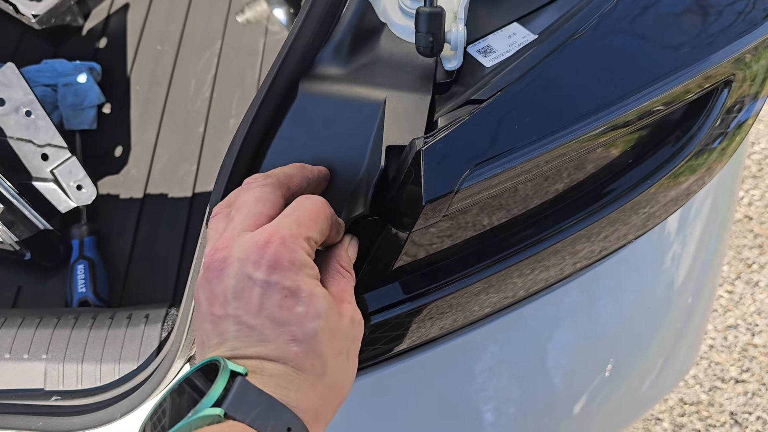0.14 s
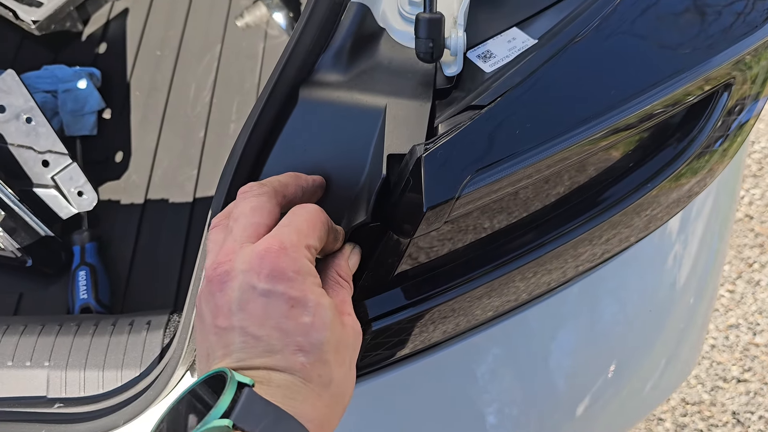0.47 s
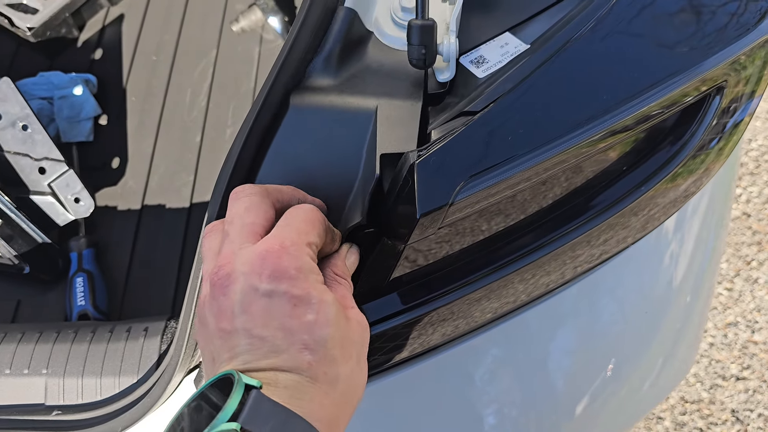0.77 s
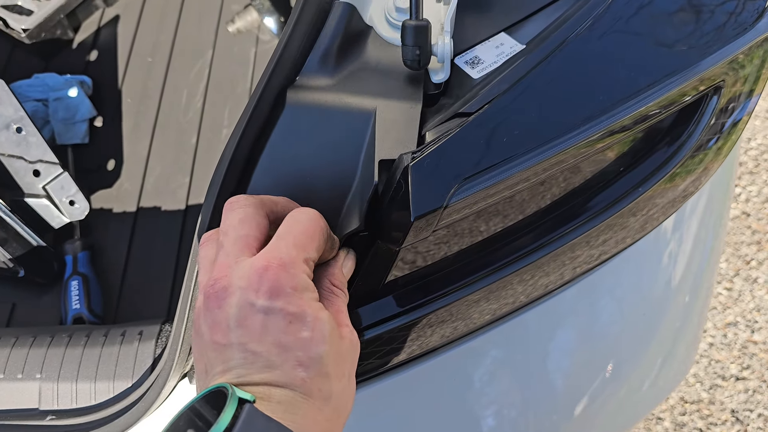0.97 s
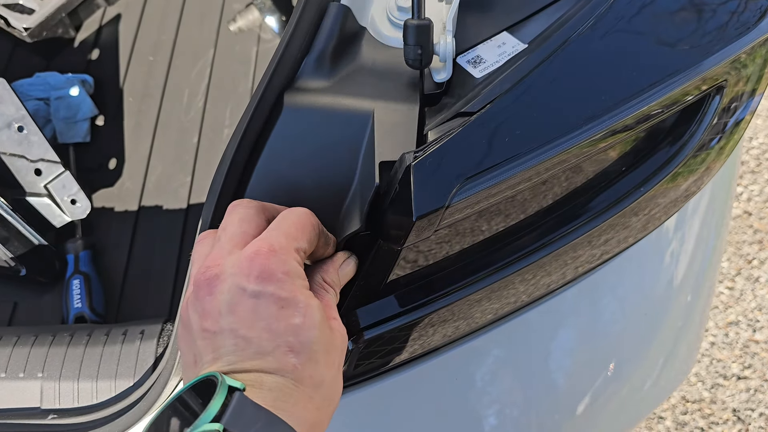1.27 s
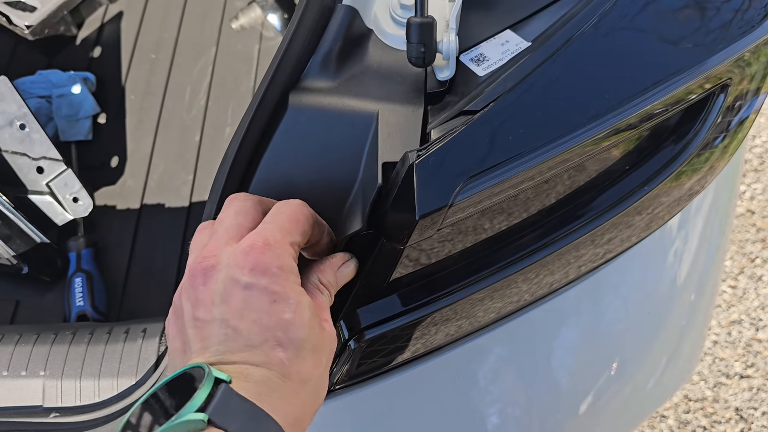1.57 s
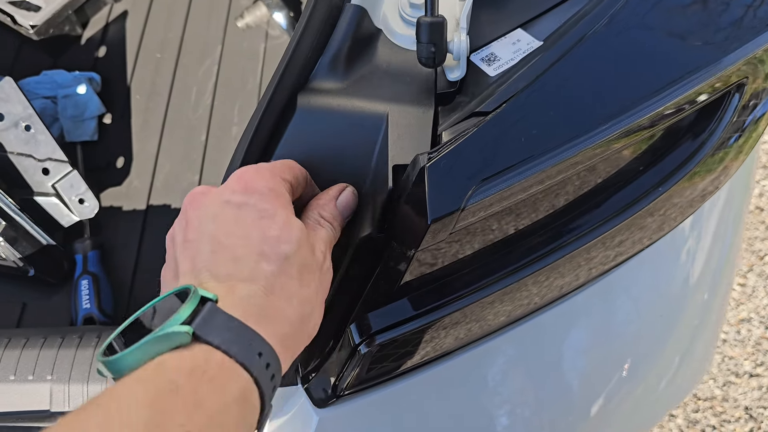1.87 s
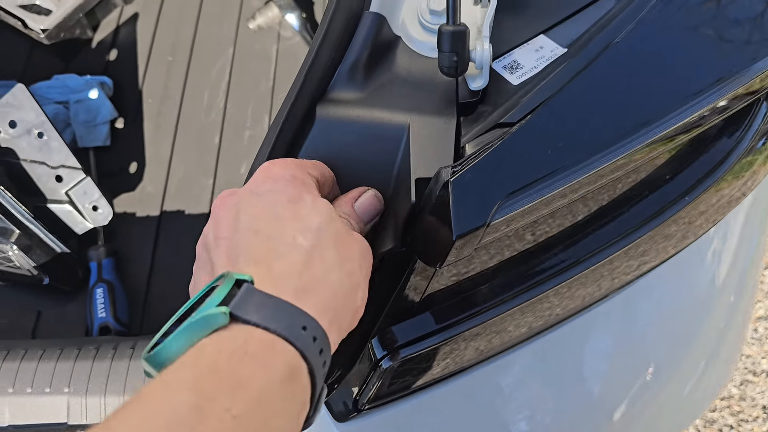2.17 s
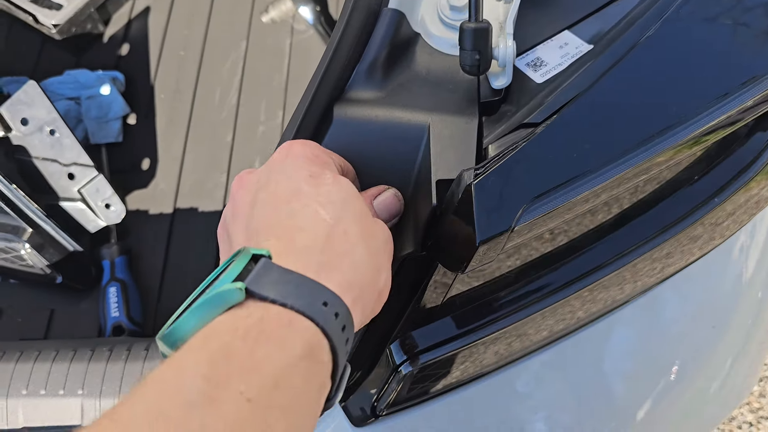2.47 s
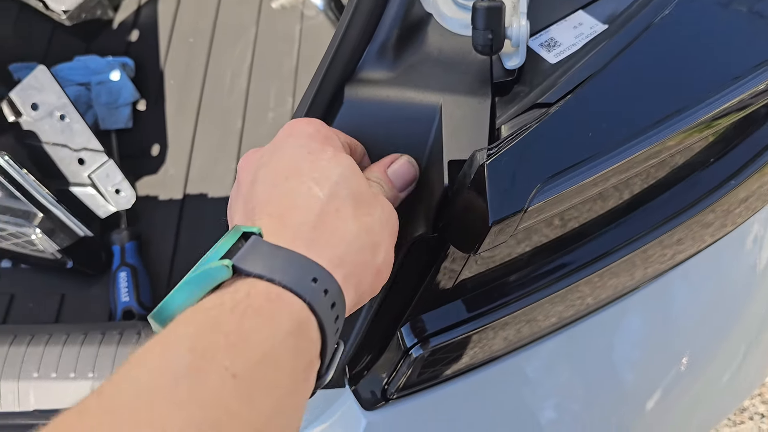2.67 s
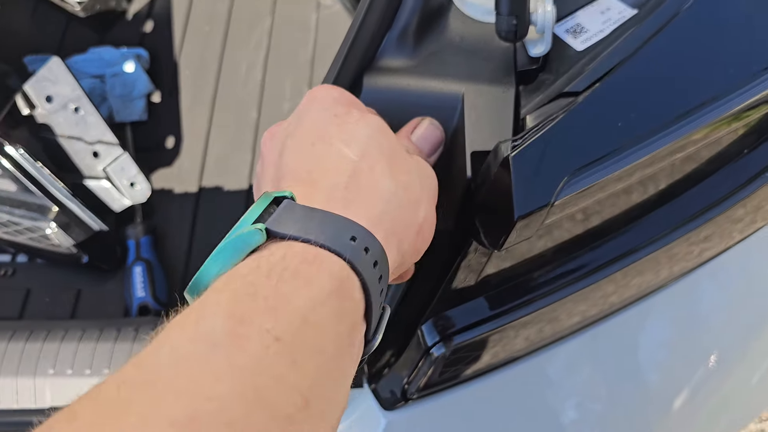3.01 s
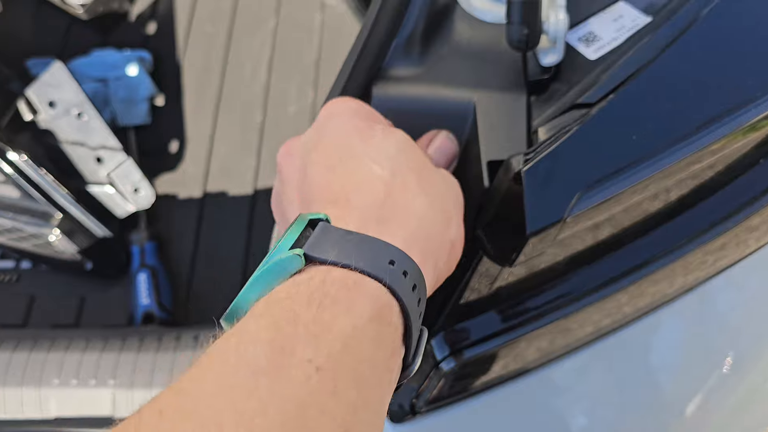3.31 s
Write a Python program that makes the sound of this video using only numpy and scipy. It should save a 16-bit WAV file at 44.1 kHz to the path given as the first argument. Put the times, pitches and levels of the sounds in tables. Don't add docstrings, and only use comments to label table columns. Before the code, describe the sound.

Close, dry plastic clicks, dull panel knocks and faint finger scrapes at a car's open cargo bay, a quieter stretch, then one sharp seating snap; low road rumble, distant dove and songbird behind.

```python
import sys
import numpy as np
from scipy import signal
from scipy.fft import rfft, irfft
from scipy.io import wavfile
from scipy.ndimage import uniform_filter1d

SR = 44100
rng = np.random.default_rng(int(sys.argv[2]) if len(sys.argv) > 2 else 0)


def linear_from_db(decibels):
    return 10 ** (np.asarray(decibels, float) / 20)


def transcribe(u):
    v = np.clip(np.atleast_2d(u).T, -1, 1)
    q = np.round(v * 32767).astype(np.int16)
    wavfile.write(sys.argv[1], SR, q)


N = 152145

PORT_LAG = 4


def evened(x):
    return x / np.sqrt(np.mean(x ** 2) + 1e-20)


def peaked(x):
    return x / abs(x).max()


def read(points, hz):
    f, value = np.transpose(points)
    return np.interp(np.log(hz + 1), np.log(f + 1), value)


def add(mix, start_s, sound):
    part = mix[..., round(start_s * SR):][..., :sound.shape[-1]]
    part += sound[..., :part.shape[-1]]


# pitch_hz, level_db (per Hz)
YARD = [(18, -30.5), (30, -16), (59, -10), (145, -19.5), (239, -17.5), (394, -25), (2410, -37), (6000, -52),
        (16000, -56)]
# pitch_hz, likeness (1 = same)
SAME = [(60, .98), (200, .93), (550, .4), (1650, -.15)]
# start_s, sleeve_and_hand_level_db, passing_traffic_level_db
STIR = [(0, -3, 6.5), (.45, -5.5, 3.5), (1.499, -1, 6), (2.0, -5.5, 0.5), (2.25, -8, 4.5), (2.7, -6, 8)]
YARD_DB, PATCHY_DB, SWELL_DB = -54, 1.5, .8


def yard():
    frames, hz = N // 256 + 5, np.fft.rfftfreq(1024, 1 / SR)
    t = np.arange(frames) * 256 / SR
    a, b, c, d, patches = rng.standard_normal((frames, 513, 5)).T
    patches = uniform_filter1d(patches, size=8, axis=0)
    patches = evened(uniform_filter1d(patches, size=14, axis=1))
    swell = evened(sum(np.sin(2 * np.pi * (f * t + rng.random())) / np.sqrt(f)
                       for f in np.geomspace(.3, 6, 20)))
    same = read(SAME, hz)[:, None]
    left = a + 1j * b
    right = same * left + np.sqrt(1 - same ** 2) * (c + 1j * d)
    z = np.array([left, right])
    z *= linear_from_db(read(YARD, hz)[:, None] + PATCHY_DB * patches + SWELL_DB * swell)
    z /= np.sqrt(np.mean(signal.istft(z, nperseg=1024, noverlap=768)[1] ** 2))

    at, hand_db, road_db = np.transpose(STIR)
    high = (hz ** 2 / (hz ** 2 + 150 ** 2))[:, None]
    z *= linear_from_db(high * np.interp(t, at, hand_db) + (1 - high) * np.interp(t, at, road_db))
    floor = signal.istft(z, nperseg=1024, noverlap=768)[1][:, :N]
    return linear_from_db(YARD_DB) * floor * linear_from_db(np.array([[.7], [-.7]]))


WARBLE, FLUTTER_DB = .006, 2.2


def whistle(length_s, from_hz, to_hz, db):
    t = np.arange(0, length_s, 1 / SR)
    drift = uniform_filter1d(rng.standard_normal((2, SR // 2)), size=500)
    waver, flutter = uniform_filter1d(drift, size=500)
    glide = from_hz + (to_hz - from_hz) * t / length_s
    hz = glide * (1 + WARBLE * evened(waver)[:len(t)])
    level = np.sqrt(2) * linear_from_db(db + FLUTTER_DB * evened(flutter)[:len(t)])
    return level * np.sin(np.pi * t / length_s) ** 0.2 * np.sin(2 * np.pi * np.cumsum(hz) / SR)


# start_s, length_s, from_hz, to_hz, level_db
COOS = [
    (.7, .055, 490, 520, -59),
    (.745, .09, 590, 580, -59),
    (.83, .04, 560, 490, -66),
    (1.55, .16, 495, 470, -64),
    (2.74, .24, 482, 468, -62),
    (2.99, .13, 460, 455, -70),
]
# start_s, length_s, from_hz, to_hz, level_db
NOTES = [(.33, .05, 2250, 2450, -80), (.45, .08, 2500, 2520, -81), (.672, .02, 3000, 3000, -76),
         (2.405, .035, 2800, 2650, -78), (2.44, .04, 2650, 2400, -81), (.37, .09, 2500, 2440, -80),
         (.57, .1, 2640, 2620, -71), (.67, .045, 2700, 2230, -75), (.765, .055, 3050, 3030, -72),
         (.95, .05, 2700, 2680, -74), (2.49, .045, 2500, 2500, -76), (2.54, .06, 2650, 2640, -77),
         (2.6, .05, 2450, 2270, -77), (2.83, .16, 2665, 2675, -73), (2.92, .07, 2450, 2250, -79),
         (3.0, .18, 2665, 2630, -76)]


def birds():
    song = np.zeros(N)
    for start_s, *note in COOS + NOTES:
        add(song, start_s, whistle(*note))
    return np.array([song, song])


# pitch_hz, t60_s
BAY = [(100, 0.33), (1000, 0.095), (3000, 0.14), (8000, 0.055)]


def bay(x, like):
    taps = np.zeros((2, SR // 2))
    slots = np.arange(200, SR // 2 - 20, 20)
    at = slots + rng.integers(0, 20, (2, len(slots)))
    np.put_along_axis(taps, at, rng.choice([-1., 1.], at.shape), 1)
    taps[1] = like * taps[0] + np.sqrt(1 - like ** 2) * taps[1]
    hz, t, z = signal.stft(taps, SR, nperseg=256)
    tail = signal.istft(z * linear_from_db(-60 * t / read(BAY, hz)[:, None]), SR, nperseg=256)[1]
    return signal.fftconvolve(x, tail / np.linalg.norm(tail[0]), axes=1)[:, :N]


DETUNE, SPOT_DB = .03, 3.


def ring(modes, seconds, luck):
    hz, db, t60 = np.transpose(modes)[:, :, None]
    t, k = np.arange(0, seconds, 1 / SR), len(modes)
    level = linear_from_db(db + SPOT_DB * luck[:k, None] - 60 * t / t60)
    wave = np.sin(2 * np.pi * hz * (1 + DETUNE * luck[k:2 * k, None]) * t)
    side = np.sign(luck[k - 1::-1, None])
    return (level * wave * side).sum(0)


def plate(lo_hz, hi_hz, t60, weight_db, count):
    hz = np.geomspace(lo_hz, hi_hz, count)
    return np.transpose([hz, weight_db(hz), t60 * np.sqrt(hz.mean() / hz)])


# pitch_hz, level_db, t60_s
PANEL = [(59, -8, .9), (129, 2, .2), (180, -3, .12), (248, 0, .14), (355, 0, .15), (404, -2, .12),
         (490, 0, .1), (580, -4, .08)]
PANEL_DB, SWELL_POWER = -6, 1.2


def knock(db, hz, cycles):
    t = np.arange(0, .5, 1 / SR)
    spent = t * hz / cycles
    flex = np.sin(2 * np.pi * hz * t) * spent ** SWELL_POWER * linear_from_db(-60 * spent)
    push = np.sin(np.pi * np.clip(t[:400] * hz * 2, 0, 1)) ** 2
    trim = signal.fftconvolve(push, ring(PANEL, .5, rng.standard_normal(32)))[:len(t)]
    return linear_from_db(db) * (peaked(flex) + linear_from_db(PANEL_DB) * peaked(trim))


# start_s, peak_level_db, pitch_hz, cycles (to die by 60 dB)
KNOCKS = [(.097, -35, 220, 16), (.704, -47, 135, 8), (.745, -48, 215, 12), (.765, -49, 260, 10),
          (.803, -48, 240, 14), (.895, -28, 460, 12), (.915, -30, 243, 12), (1.007, -38, 430, 12),
          (1.106, -20, 375, 7), (1.118, -29, 270, 8), (1.132, -31, 200, 10), (1.15, -35, 170, 10),
          (1.267, -34, 448, 11), (1.301, -20, 260, 12), (1.319, -23, 280, 10), (1.331, -26, 210, 10),
          (1.352, -32, 240, 10), (1.37, -34, 190, 10), (1.458, -32, 230, 12), (1.655, -42, 234, 16),
          (1.74, -33, 260, 10), (1.756, -31, 217, 12), (1.897, -27, 230, 22), (1.957, -38, 410, 12),
          (1.976, -36, 259, 10), (2.013, -40, 228, 16), (2.379, -34, 230, 14), (2.654, -44, 270, 10),
          (2.665, -43, 238, 12), (2.688, -44, 242, 12), (2.706, -45, 200, 8), (2.822, -49, 240, 12),
          (2.845, -47, 260, 10), (2.862, -48, 185, 12), (2.945, -42, 232, 14), (2.972, -42, 215, 12),
          (3.213, -16, 200, 10), (3.222, -20, 240, 10), (3.2335, -14, 235, 5), (3.247, -29, 190, 10),
          (3.262, -26, 130, 10), (3.274, -29, 180, 10), (3.315, -32, 200, 10)]
LEFT_LOW_DB = .8


def knocks():
    dull = np.zeros(N)
    for start_s, *push in KNOCKS:
        add(dull, start_s, knock(*push))
    return np.array([linear_from_db(LEFT_LOW_DB) * dull, linear_from_db(-LEFT_LOW_DB) * np.roll(dull, PORT_LAG)])


LEFT_DB, PORT_LIKE = 1.4, .6


def ports(a, b):
    right = PORT_LIKE * a + np.sqrt(1 - PORT_LIKE ** 2) * b
    return np.array([linear_from_db(LEFT_DB) * a, linear_from_db(-LEFT_DB) * np.roll(right, PORT_LAG)])


GRIT_PER_S, GRIT_SPREAD_DB, GRIT_RING_DB, LUMP_DB = 8000, 2.8, 2, 1.8


def scrape(length_s, db, tilt_db):
    t = np.arange(8192) / SR
    stroke = np.sin(np.pi * np.clip(t / length_s, 0, 1) ** .7) ** 2
    stroke *= linear_from_db(LUMP_DB * evened(uniform_filter1d(rng.standard_normal(len(t)), size=350)))
    grit = rng.standard_normal((2, len(t)))
    grit *= linear_from_db(GRIT_SPREAD_DB * rng.exponential(1, len(t)))
    grit *= rng.random(len(t)) < GRIT_PER_S / SR

    hz = np.fft.rfftfreq(len(t), 1 / SR)
    skin = ring(plate(1000, 4500, 0.0099, lambda f: 0 * f, count=12), .05, rng.standard_normal(32))
    peaks = linear_from_db(GRIT_RING_DB) * evened(abs(rfft(skin, len(t)))[:1000])
    colour = linear_from_db(tilt_db * np.log2(hz / 2000 + .15))
    colour *= 1 + np.pad(peaks, (0, len(hz) - 1000))
    colour *= hz ** 2 / (hz ** 2 + 250 ** 2)
    return linear_from_db(db) * ports(*(evened(irfft(rfft(grit) * colour)) * stroke))


# start_s, length_s, level_db, brightness_db_per_octave
SCRAPES = [(.02, .07, -60, -2), (.5, .035, -66, 0), (0.591, .05, -65, -2), (.685, .03, -66, 0),
           (1.13, .12, -59, -6), (0.874, 0.079, -49, -4.5), (1.017, 0.063, -45.5, -6.5),
           (1.075, .05, -43, -8), (1.275, 0.058, -42.5, -7), (1.349, 0.041, -42.5, -14.5),
           (1.457, 0.026, -48, -9.5), (1.562, 0.28, -52, -18), (1.682, 0.097, -50, -2),
           (1.74, 0.047, -33.5, -18.5), (1.798, 0.11, -52.5, -2.5), (1.891, 0.066, -60.5, -1),
           (2.644, 0.1, -60, 0.5), (2.798, 0.098, -54, -0.5), (2.869, 0.038, -56, -12),
           (3.18, .06, -48, -1), (3.215, .05, -36, -5), (3.208, 0.029, -22, -13),
           (3.269, 0.059, -44.5, -4.5), (3.365, 0.065, -59, -6), (3.402, 0.13, -59, -1)]


def scrapes():
    mix = np.zeros((2, N))
    for start_s, *stroke in SCRAPES:
        add(mix, start_s, scrape(*stroke))
    return mix


SLIPS_PER_S, SLIP_SPREAD_DB, SLIP_MS = 5000, 4., 3.
TICK_DB, BODY_DB, SIZZLE_DB, SEAT_DB = 4., 7., 4., 3
CLIP_T60_S, BODY_T60_S, SIZZLE_T60_S = .011, .022, .008
FOCUS_OCT, SHOULDER_DB, SIZZLE_TILT_DB = .2, -6, -9


def slip_burst():
    t = np.arange(1024) / SR
    happens = rng.random(len(t)) < SLIPS_PER_S / SR
    size_db = SLIP_SPREAD_DB * (np.minimum(rng.exponential(1, len(t)), 3) - 5)
    sign = rng.choice([-1., 1.], len(t))
    slips = happens * sign * linear_from_db(size_db) * np.exp(-((t * 1000 - 1) / SLIP_MS) ** 2)
    slips[0] = .4
    return slips


def tick(db, body_db, sizzle_db, ring_hz, own=None):
    def focus(f):
        return SHOULDER_DB * (1 - np.exp(-(np.log2(f / ring_hz) / FOCUS_OCT) ** 2))

    slips = slip_burst()
    clip = plate(1500, 4800, CLIP_T60_S, focus, count=32)
    cover = plate(570, 1480, BODY_T60_S, lambda f: 0 * f, count=14)
    edge = plate(5583, 17370, SIZZLE_T60_S, lambda f: SIZZLE_TILT_DB * np.log2(f / 5000), count=30)
    parts = ((clip, TICK_DB), (cover, BODY_DB + body_db), (edge, SIZZLE_DB + sizzle_db))
    faces = []
    for _ in range(2):
        face = 0
        for modes, part_db in parts:
            rung = signal.fftconvolve(slips, ring(modes, 0.028, rng.standard_normal(64)))
            face = face + linear_from_db(part_db) * peaked(rung)
        faces.append(face)
    if own:
        onset = np.minimum(np.arange(len(faces[0])) / SR * 1000 / SLIP_MS + .3, 1)
        for i in range(2):
            seated = ring(own, .06, .2 * rng.standard_normal(64))[:len(onset)] * onset
            faces[i] = faces[i] + linear_from_db(TICK_DB + SEAT_DB) * peaked(seated)
    return linear_from_db(db) * ports(*faces)


# start_s, peak_level_db, body_db (re peak), sizzle_db (re peak), loudest_ring_hz
TICKS = [(0.0355, -38, -4.5, -13, 1930), (0.0951, -62, 10, -9, 1610), (0.8944, -33.5, 5.5, -11, 1600),
         (0.9277, -31, -3, -18, 2620), (1.0015, -46, 2, -15, 3040), (1.0904, -37.5, -1.5, -29, 1680),
         (1.1049, -33.5, 2.5, -15, 1410), (1.266, -41, 2, -44, 1640), (1.295, -35, -18.5, -17, 1670),
         (1.316, -20.5, -7.5, -8, 3650), (1.3537, -45, -11, -5, 1790), (1.4584, -57, 3, -20, 1530),
         (1.738, -32, -3, -1, 4700), (1.7555, -27.5, -8.5, -13.5, 3220), (1.953, -34.5, -2, -15.5, 2410),
         (2.3767, -55, 13.5, -38, 1430), (2.9426, -62, 8, -21, 2660), (.7083, -62, 0, -15, 2260),
         (.773, -64, -10, 2, 4700), (.88, -50, 0, -5, 4500), (.918, -44, 0, -10, 4400),
         (1.0306, -48, 0, -8, 1500), (1.7075, -48, 0, -5, 2240), (3.2285, -30, -3, -8, 3600),
         (3.2854, -43, -6, -12, 3200)]
SNAP = (3.207, -12, -14, -4, 4000)
# pitch_hz, level_db, t60_s
SEAT = [(673, -10, .04), (813, -3, .045), (960, -5, .04), (1340, -1, .035), (1820, -6, .025),
        (2200, -3, .025), (2622, -3, .025), (3187, -5, .02), (3505, -3, .025), (4021, 4, .022),
        (4334, 4, .02), (4936, -14, .015), (6223, -14, .012)]


def clips():
    mix = np.zeros((2, N))
    for start_s, *slip in TICKS:
        add(mix, start_s, tick(*slip))
    add(mix, SNAP[0], tick(*SNAP[1:], own=SEAT))
    return mix


BAY_DB, BAY_LOW_DB, BIRD_ECHO_DB = -15, -16, -4


def scene():
    far, low = birds(), knocks()
    sharp = scrapes() + clips()
    outside = yard() + far + linear_from_db(BIRD_ECHO_DB) * bay(far, 0.43)
    panel = low + linear_from_db(BAY_LOW_DB) * bay(low, 1)
    return outside + panel + sharp + linear_from_db(BAY_DB) * bay(sharp, 0.11)


def low_pass(x):
    return signal.sosfilt(signal.butter(12, 16660, fs=SR, output="sos"), x)


LOW_CUT_HZ, EDGE_HZ, CEILING = 44, 16000, 1.3


def record(dry):
    cut = signal.sosfilt(signal.butter(2, LOW_CUT_HZ, "high", fs=SR, output="sos"), dry)
    limited = CEILING * np.tanh(cut / CEILING)
    edged = signal.oaconvolve(limited, signal.firwin(127, EDGE_HZ, fs=SR)[None], "same")
    return low_pass(edged)


dry = scene()
out = record(dry)
transcribe(out)
```